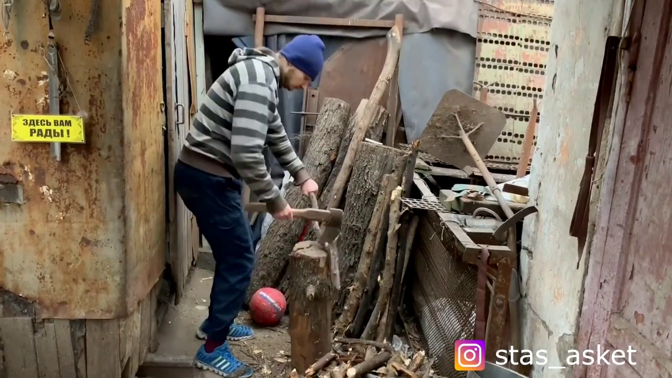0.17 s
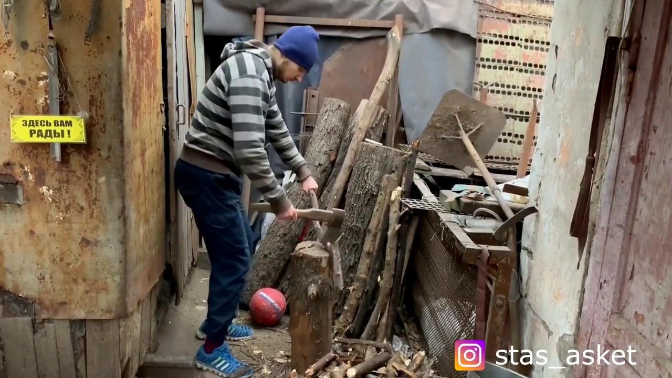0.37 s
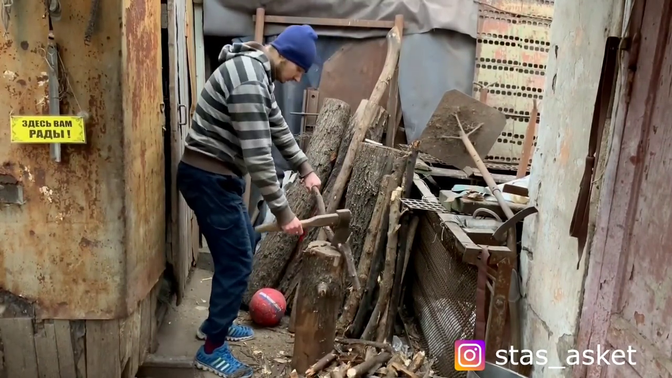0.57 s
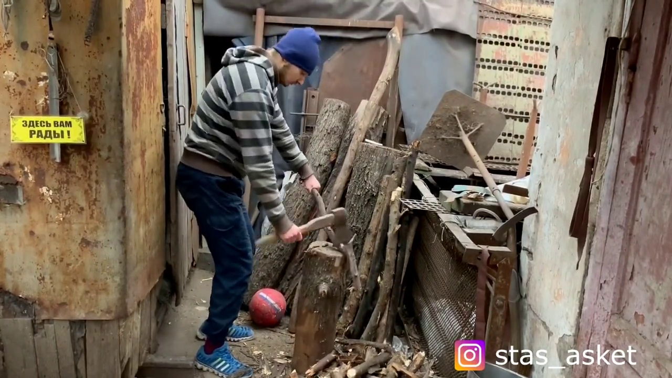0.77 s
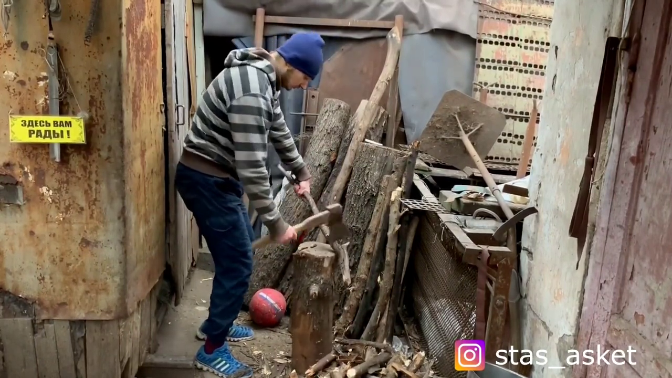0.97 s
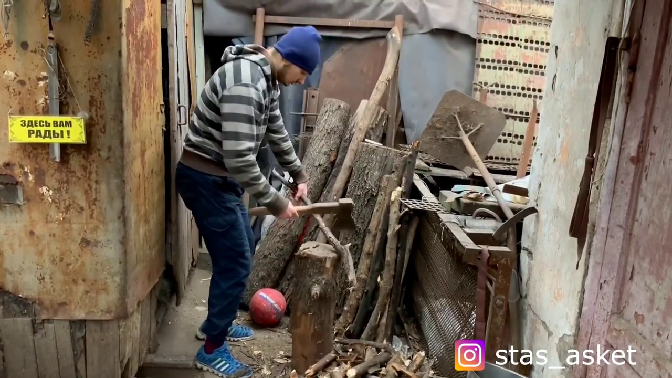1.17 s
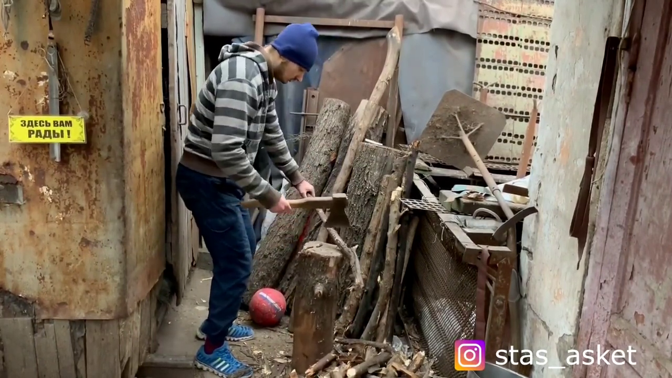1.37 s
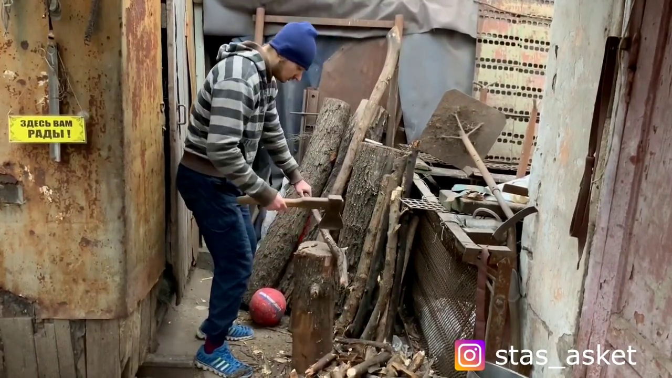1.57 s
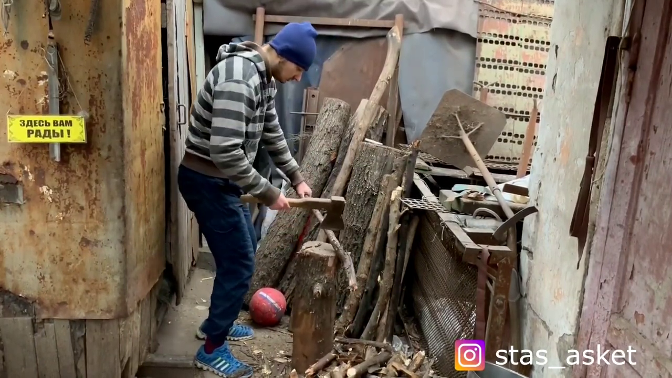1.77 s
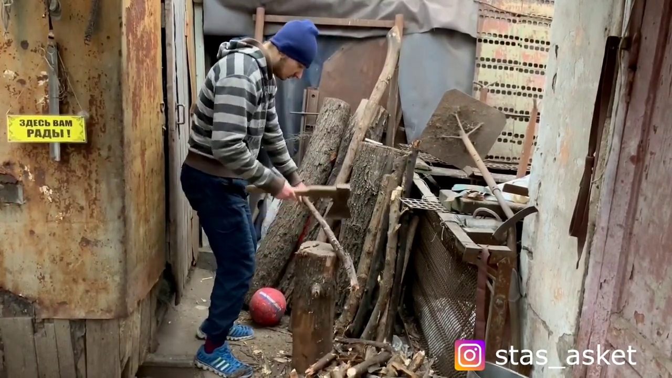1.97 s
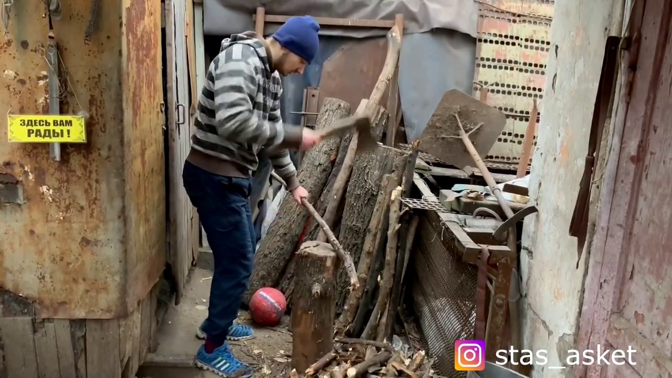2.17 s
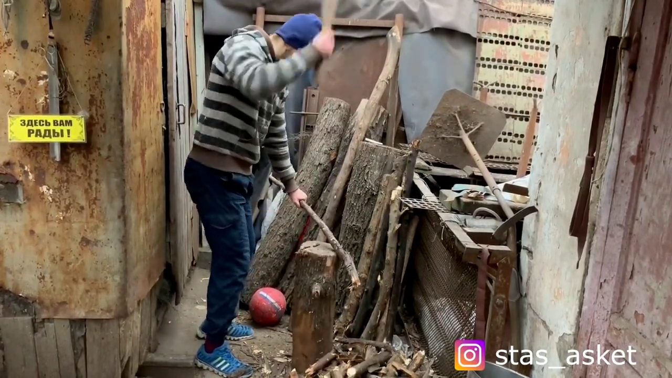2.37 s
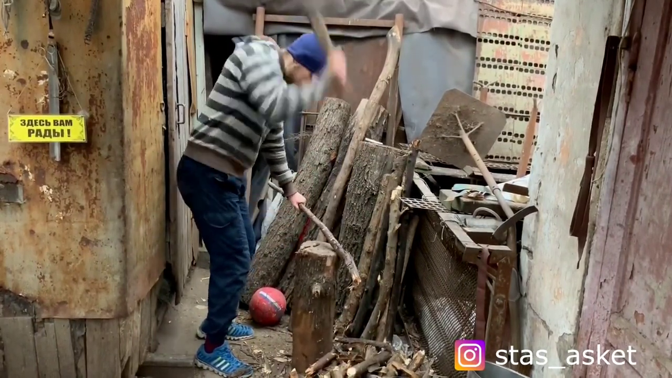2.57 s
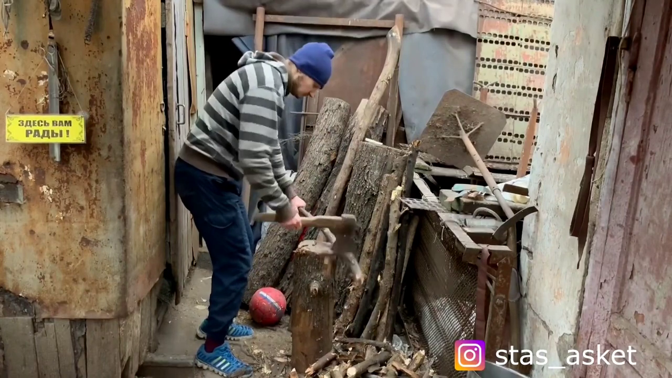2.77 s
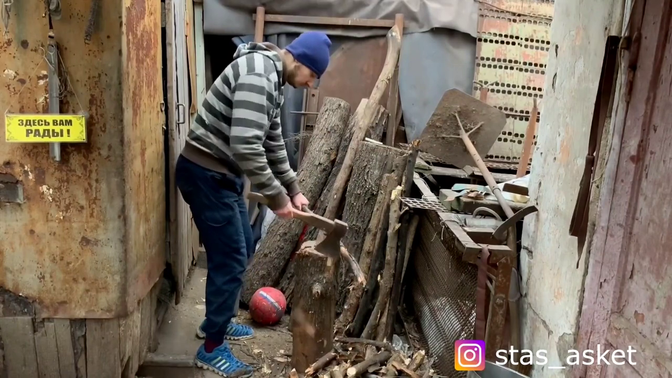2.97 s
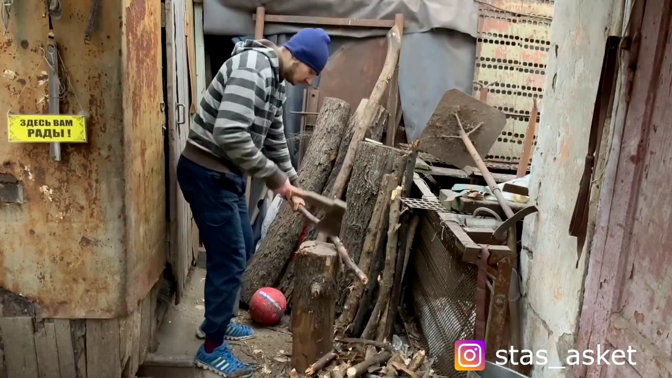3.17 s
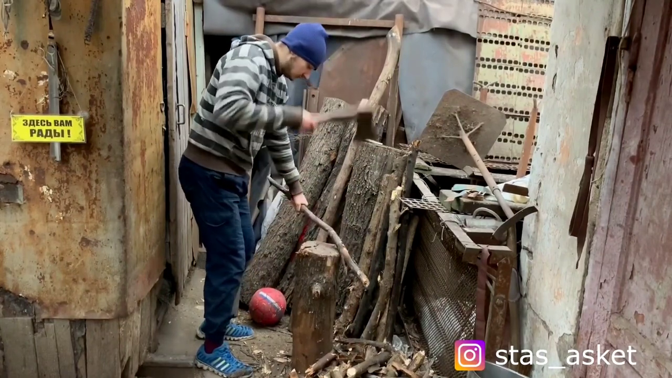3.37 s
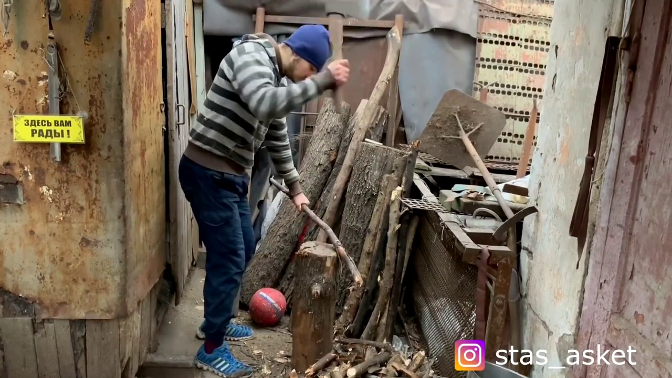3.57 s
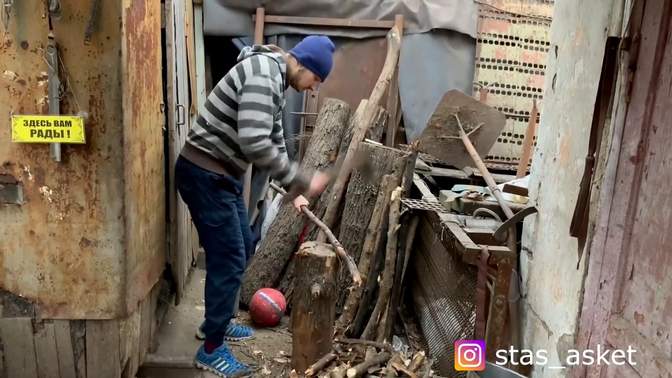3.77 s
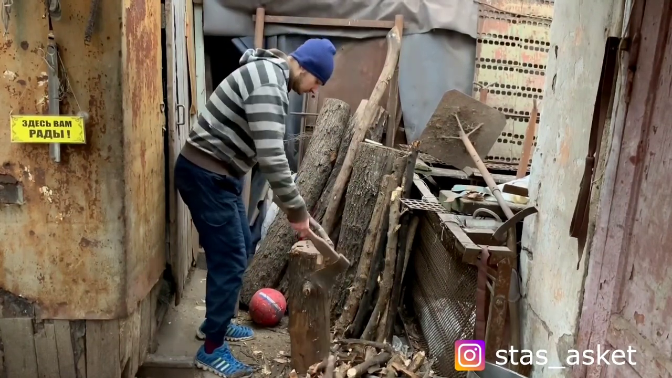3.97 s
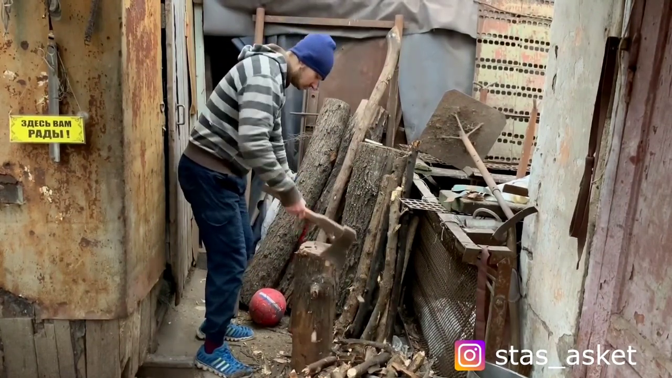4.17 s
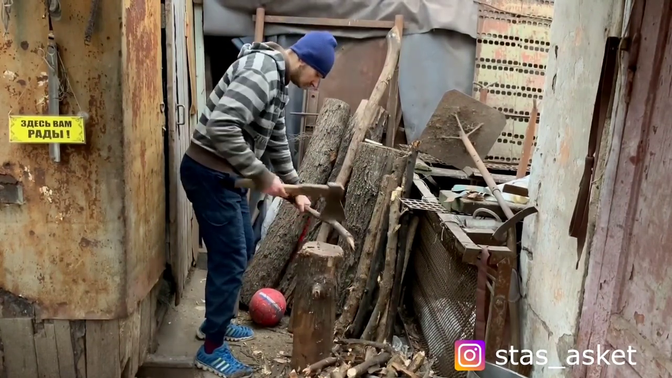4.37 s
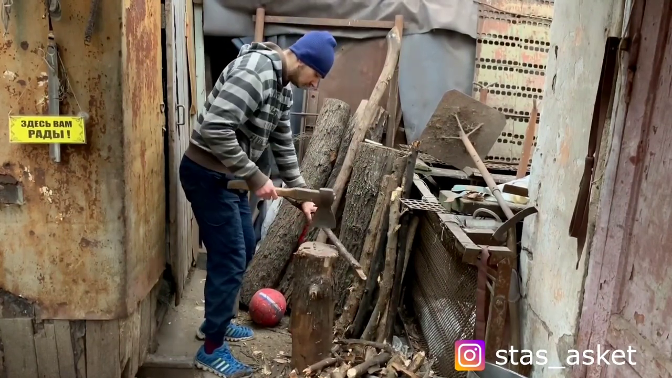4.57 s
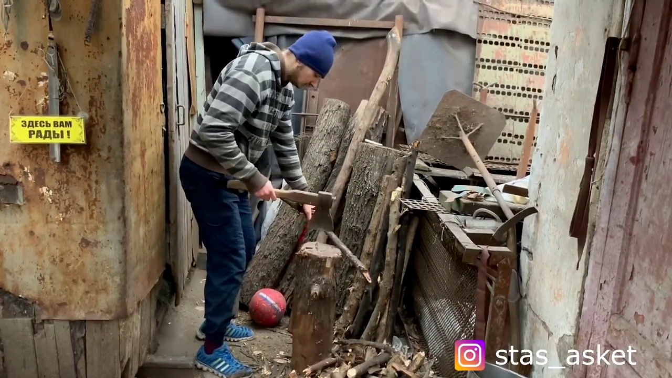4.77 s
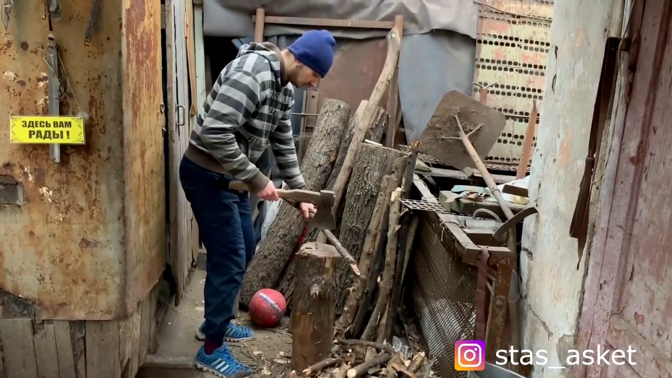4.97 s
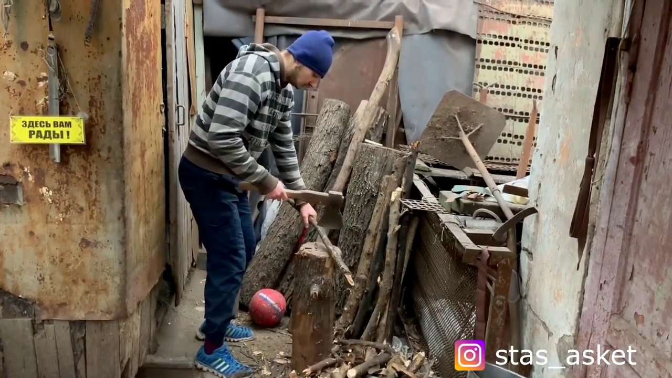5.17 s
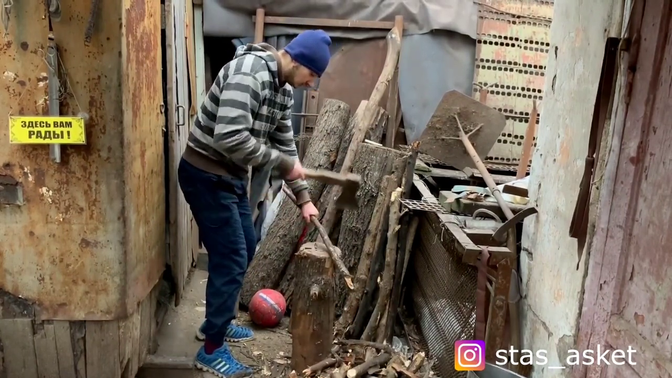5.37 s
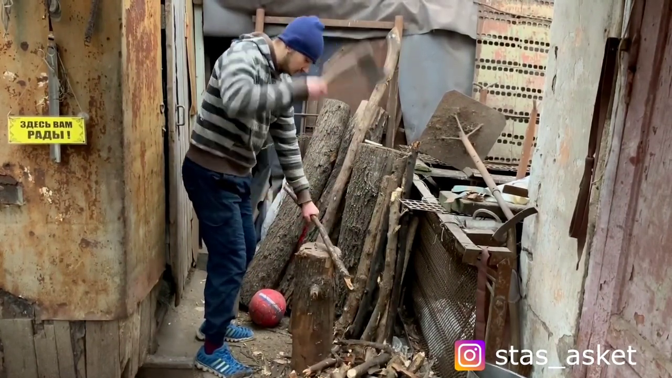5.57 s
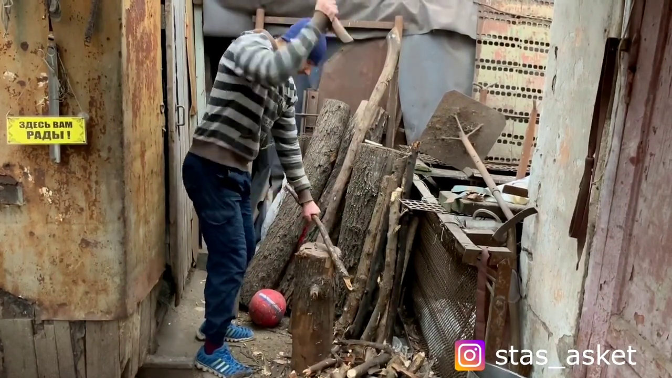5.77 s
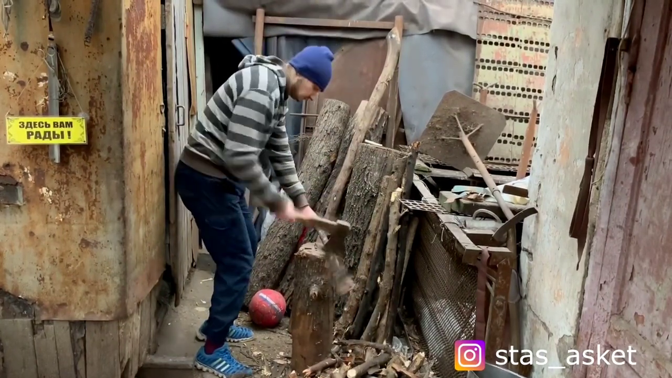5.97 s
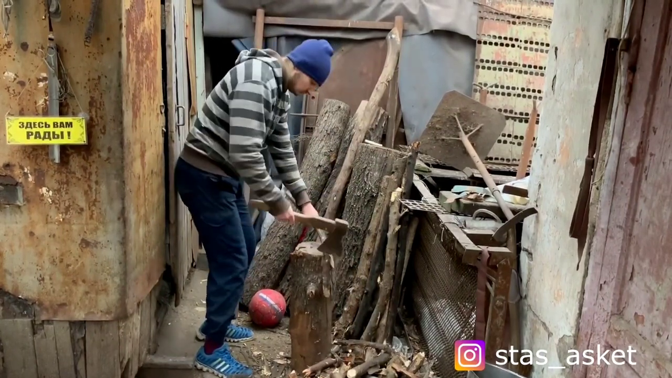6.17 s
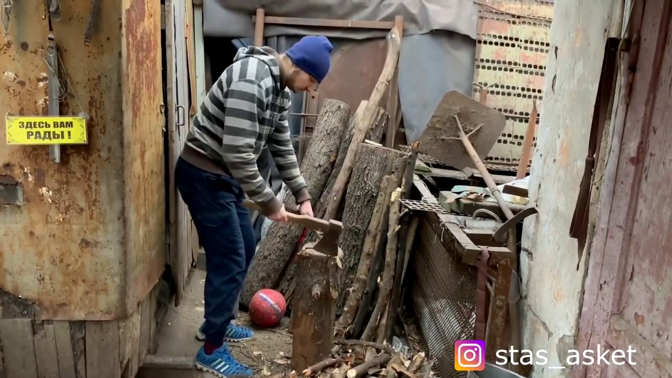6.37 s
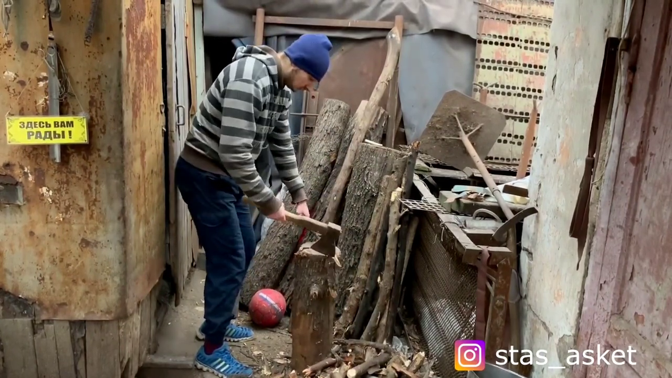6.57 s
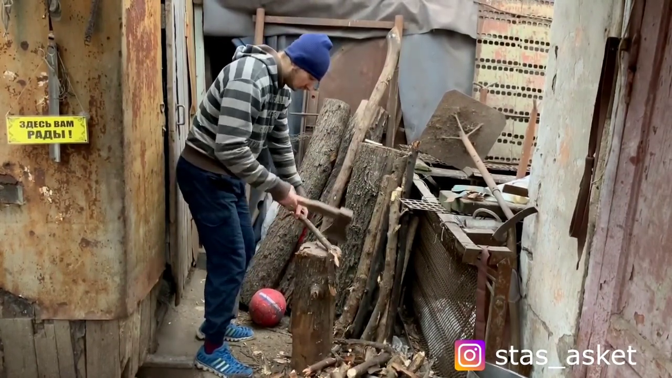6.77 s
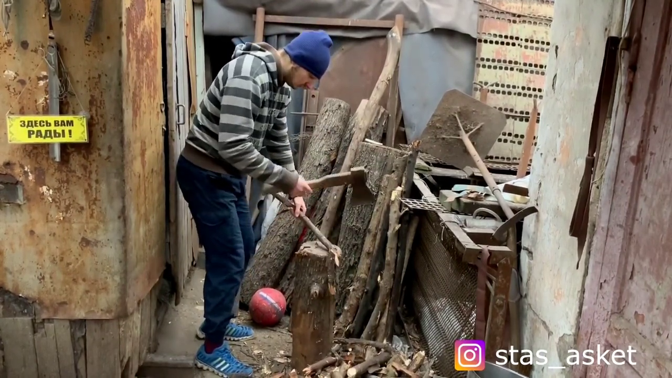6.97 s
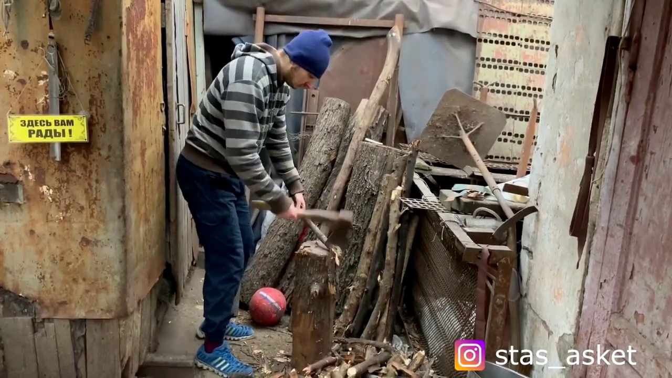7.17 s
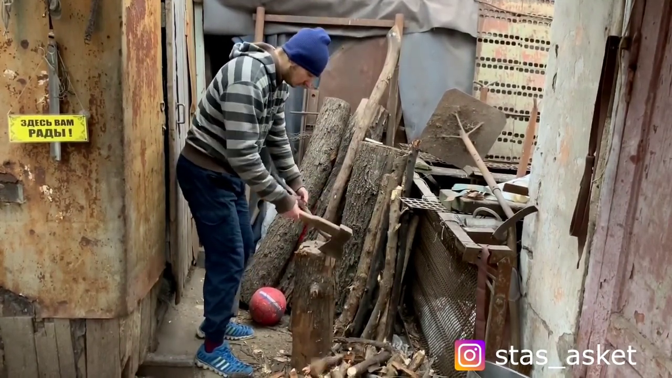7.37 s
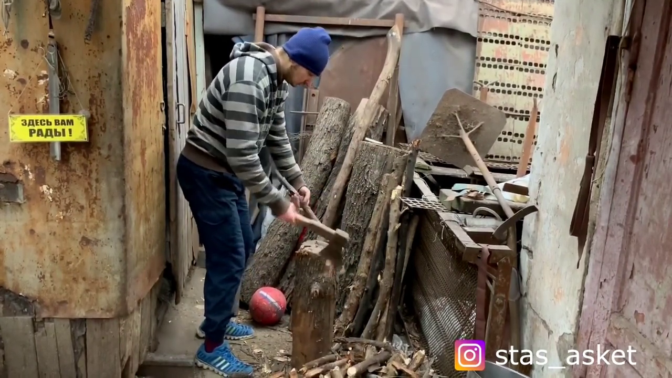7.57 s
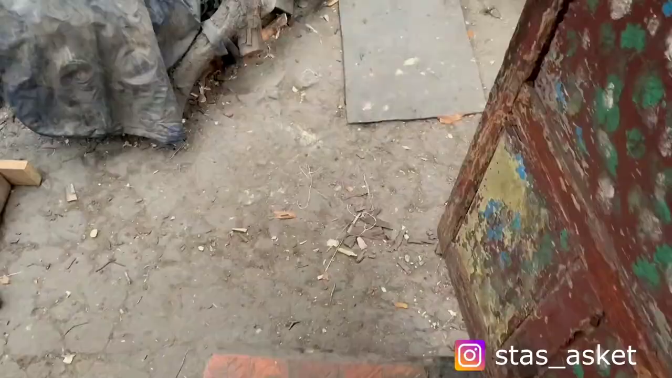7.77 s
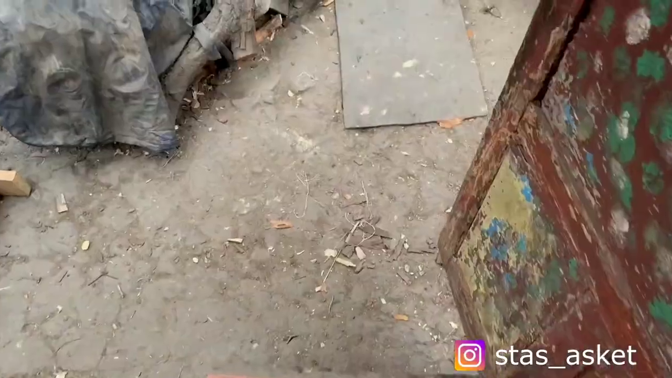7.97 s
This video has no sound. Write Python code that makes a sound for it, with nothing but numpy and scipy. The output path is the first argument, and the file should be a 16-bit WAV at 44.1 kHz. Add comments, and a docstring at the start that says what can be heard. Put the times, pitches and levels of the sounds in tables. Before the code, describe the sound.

Close, dry chopping of a thin branch: hard woody cracks with short thuds, loose pieces tapping and scraping, soft wind rumble underneath.

```python
"""Five hatchet blows crack and thud through a thin branch on a wooden block, close to a stereo microphone.
Cut pieces knock, clatter and scrape between blows, and metal rings faintly; all in a narrow yard between sheds.
Wood is bursts of fibre clicks ringing modes and short wall reflections; metal and hoots are sines.
Wind on the microphone and the distant town are coloured noise; a far breathy whistle is noise on a wavering pitch."""
import sys
import numpy as np
from scipy import signal
from scipy.fft import rfft, irfft
from scipy.io import wavfile

SR = 44100
rng = np.random.default_rng(int(sys.argv[2]) if len(sys.argv) > 2 else 0)


def to_wav(s):
    """Save 16-bit WAV."""
    ch = np.atleast_2d(s).T  # columns
    pcm = np.round(np.clip(ch, -1, 1) * 32767)  # PCM
    wavfile.write(sys.argv[1], SR, pcm.astype(np.int16))


def boost_factor(decibels):
    """Convert a level in decibels to a linear amplitude factor."""
    exponent = np.asarray(decibels, float) / 20
    return 10 ** exponent


N = 353064  # samples, about 8 s

# Table levels are nominal: the layers' own offsets and the final gain come on top.
# axe blows: (time [s], crack level [dB], knock re crack [dB], splinter treble re crack [dB], thud re crack [dB])
BLOWS = [(0.03, -2.5, -7.5, -9, -9.5), (2.6611, -1.5, -9, -10.5, -16), (3.7884, -2.5, -7, -8, -17.5),
         (5.9456, -6.5, -2.5, -16.5, -14), (7.1686, -11.5, -7.5, -9, -10.5)]
# faint swells of crackle, most about 10 to 30 ms ahead of a hard hit: (time [s], level [dB])
SWELLS = [(0.021, -20), (2.651, -16.5), (3.768, -22.5), (5.933, -14), (7.141, -32), (7.325, -38)]
# single knocks of wood on wood: (time [s], level [dB], knock re level [dB], clack [Hz], treble re level [dB])
TAPS = [(0.2788, -48, -12, 2380, -16.5), (0.595, -50, -1, 2570, -9), (0.6379, -41.5, -7.5, 3740, -9),
        (0.8121, -40, -4.5, 3860, -17), (0.9532, -35.5, -22, 1900, -15), (1.0934, -38, -12.5, 2380, -11),
        (1.2276, -48.5, -11.5, 2510, -11), (1.5229, -50, -8.5, 4040, -13.5), (1.6631, -39, 0.5, 2030, -13),
        (2.7816, -41.5, -36, 3490, -5), (2.9274, -44, -11, 3000, -16.5), (2.9871, -56, -12, 3080, 3.5),
        (3.1113, -30.5, -10, 2100, -11), (3.274, -43.5, -40, 4610, -5), (3.3717, -47.5, -20, 2980, -19.5),
        (3.3886, -45, -7.5, 1730, -17), (3.565, -59, -33, 4950, -3), (3.9574, -20, -11.5, 2340, -14.5),
        (4.0064, -53, 14, 1520, -41), (4.2453, -51, 0, 3230, -2.5), (4.3293, -38, -25, 2190, -56.5),
        (4.3784, -37.5, -22, 2280, -42.5), (5.0644, -39, -6, 2500, -9), (5.48, -63.5, -21, 2995, -6.5),
        (6.0851, -38.5, -22, 4290, -7.5), (6.1094, -35.5, -6, 2310, -7), (6.1594, -42.5, -8, 3170, -4.5),
        (6.2294, -48.5, -3, 1530, -1.5), (6.2901, -39.5, -39, 1920, -7), (6.4153, -35.5, -14.5, 2170, -30),
        (6.6672, -43, -13, 4820, -3.5), (6.7516, -52, -7, 2570, -15), (7.3517, -24, -2.5, 3240, -14.5),
        (7.3627, -31, 10.5, 1800, -12.5), (7.3754, -37, -4, 1880, -15.5), (7.9089, -43.5, 5.5, 2210, -62)]
# pieces that land along their length and clatter:
# (time [s], level [dB], knock re level [dB], clack [Hz], treble re level [dB])
CLATTERS = [(0.1845, -30, -1, 3750, -10), (0.3656, -41, -6, 4550, -8.5), (0.5162, -47.5, -2.5, 2050, -13),
            (0.854, -45, -20, 2440, -6.5), (0.8789, -35.5, -14, 2110, -7.5), (0.9064, -37.5, -29, 1930, -8),
            (3.8664, -16.5, -0.5, 1590, -11.5), (3.9275, -34, -31, 2990, -10),
            (4.5214, -37.5, 0, 3340, -15.5), (7.5687, -50, -12, 4100, -5.5), (7.80, -58, 3, 1470, -41),
            (7.862, -58.5, 1.5, 1450, -33)]
# modes of block and branch, free of the blade: (frequency [Hz], level [dB], t60 [s])
WOOD_MODES = [(1710, -6.5, 0.064), (2040, 0, 0.031), (2350, 2.5, 0.59), (2760, -7, 0.3), (3360, -5.5, 0.26),
              (4680, -12.5, 0.43), (4670, -9.5, 0.17), (5650, -13, 0.6)]
# colour of the splintering treble: (frequency [Hz], density [dB per Hz])
SPLINTER_COLOUR = [(2940, -30), (5000, 0.5), (7170, -5.5), (8870, -3.5), (11400, -13.5), (12500, -13),
                   (14600, -15.5), (15800, -22)]
# bark scraping, twigs and chips falling, sleeves: (start [s], length [s], level in 2-9 kHz [dB rms])
RUSTLE = [(0, 0.17, -57.5), (.36, 0.035, -64), (.48, 0.13, -67), (.6, 0.025, -65.5), (.72, 0.035, -69),
          (.85, 0.087, -58.5), (1.04, 0.16, -70.5), (1.19, 0.15, -72.5), (1.39, 0.023, -76),
          (1.52, 0.073, -73), (1.7, 0.055, -65.5), (1.92, 0.099, -80.5), (2.72, 0.052, -58),
          (2.91, 0.078, -65), (3.06, 0.09, -59), (3.28, 0.2, -72.5), (3.52, 0.05, -77.5),
          (3.98, 0.24, -60.5), (4.34, 0.11, -67), (4.54, 0.053, -66.5), (4.68, .08, -86), (4.99, .03, -79),
          (5.06, .1, -73.5), (5.98, .4, -58.5), (6.45, 0.1, -68.5), (6.67, 0.065, -68.5),
          (6.98, 0.042, -92), (7.34, 0.08, -62.5), (7.52, .22, -76), (7.81, 0.2, -68.5)]
# colour of the rustle: (frequency [Hz], density [dB per Hz])
RUSTLE_COLOUR = [(350, -37.5), (600, -3), (779, 3.5), (1680, -4), (1980, -1), (8500, -9), (11500, -21.5),
                 (14100, -22), (16000, -29.5)]
# gusts on the microphone: (time [s], level [dB rms])
WIND = [(0.0, -52), (0.5, -49), (1.16, -65.5), (1.54, -47), (1.81, -63), (2.6, -57.5), (3.05, -57.5),
        (3.41, -52.5), (3.83, -39.5), (4.1, -50), (4.9, -56.5), (5.3, -49.5), (5.73, -41.5), (6.2, -46),
        (6.5, -49.5), (7.13, -49.5), (7.69, -68.5), (8.01, -49)]
# colour of the gusts: (frequency [Hz], density [dB per Hz])
WIND_COLOUR = [(12, -31), (20, -15.5), (49, 6.5), (86, 1.5), (139, -11.5), (292, -23.5), (325, -31),
               (467, -55), (500, -49), (650, -63), (1100, -120)]
# low thumps of a few cycles, mostly wind buffets, the last the thump of a tap:
# (time [s], level [dB], nominal pitch [Hz])
LOW_THUMPS = [(0.467, -38.5, 80), (3.65, -28.5, 91), (3.952, -29, 64.6), (4.007, -33.5, 69),
              (4.135, -35.5, 71.7), (4.524, -32, 75.5), (4.673, -29.5, 100.3), (4.755, -32, 85.3),
              (5.23, -36.5, 74.8), (5.533, -36, 80.7), (5.576, -30.5, 76.6), (5.642, -34.5, 57.7),
              (5.744, -34, 81.5), (5.862, -31, 51), (6.209, -31, 75.5), (6.26, -32, 115),
              (6.394, -36.5, 102.6), (6.767, -36.5, 72.7), (7.138, -37, 60.5), (7.211, -32.5, 54.5),
              (7.245, -37, 54), (7.914, -39, 206.5)]
# colour of the distant town: (frequency [Hz], density [dB per Hz])
HUM_COLOUR = [(59, -23.5), (100, -3.5), (146, -1), (549, -14), (671, -19.5), (741, -19), (1040, -24.5),
              (1150, -27), (1520, -40), (5280, -49), (7270, -60.5), (9070, -41), (12000, -54.5),
              (15600, -78.5), (22000, -120)]
# loudness of the distant town: (time [s], level [dB rms])
HUM_LEVEL = [(0, -53.5), (.6, -59.5), (2.5, -60.5), (4.0, -58.5), (5.0, -63.5), (6.2, -58.5), (7.77, -60),
             (7.92, -53), (8.01, -55)]
# a breathy far whistle that comes and goes: (start [s], length [s], level [dB], pitch [Hz])
WHISTLE = [(0.101, .7, -72, 1219), (1.856, .52, -72, 1232), (4.8, 0.63, -75.5, 1195),
           (6.45, .68, -74, 1194), (7.62, 0.118, -68, 1120)]
# short far hoots: (start [s], length [s], starting pitch [Hz], level [dB])
HOOTS = [(5.70, .16, 707.4, -59), (6.43, 0.196, 765.5, -59), (6.863, .17, 726, -52.5),
         (7.639, .125, 734.7, -52)]
# scrap metal hit by a flying piece: (time [s], frequency [Hz], level [dB], t60 [s])
CHIMES = [(.955, 1827, -51, .4), (.96, 1760, -60, .2), (.95, 2500, -57, .15), (.95, 4400, -52, .14),
          (3.32, 1850, -62, .3)]

# reflections between the sheds: decay, level re direct, corner above which they grow duller as they die
YARD_T60_S, YARD_DB, YARD_CUT_HZ = 0.12, 5.5, 9000
BLOCK_KNOCK_HZ = 970
THUD_HZ, THUD_LAG_S = (108, 181, 237), 0.013  # nominal modes; delay after the blow
RUMBLE_DB, RUMBLE_DB_PER_S = -25.5, -58  # start re thud, decay
TAP_LEAD_MS, TAP_RISE_MS = 4, 4.8  # a tap swells in softly: start ahead of its time, rise time
TAP_MS, CLATTER_MS = 4.4, 11  # decay constant of a loose piece's contact
# slopes in dB per s before, during and after a stroke, and the resting level in dB
RUSTLE_RISE, RUSTLE_SAG, RUSTLE_FALL, RUSTLE_REST_DB = 170, 4.3, 89, -88.5
WHISTLE_RISE, WHISTLE_SAG, WHISTLE_FALL, WHISTLE_REST_DB = 180, -4, 220, -84.5
HOOT_SAG_HZ_PER_S, HOOT_WOBBLE_RAD = 100, 0.035  # pitch fall; random phase step per sample
STEEL_START_S, STEEL_STOP_S = 2.77, 3.28
STEEL_HZ, STEEL_BEAT_HZ = 3075, 5.3  # upper mode, and its distance from the lower
STEEL_DB, STEEL_T60_S, STEEL_PAIR_DB = -58, 1.6, -3  # pair level: lower mode re upper
DIP_S, DIP_WIDTH_S, DIP_DB = 7.765, 0.0104, -15  # a brief dip in level near the end
STOP_HZ = 16432  # the treble is 50 dB down from here


def curve(rows):
    """Columns of a table, joined by straight lines over the scene's time."""
    s, *columns = np.transpose(rows)
    return [np.interp(np.arange(N) / SR, s, c) for c in columns]


def unit(x):
    """Scale to rms 1."""
    return x / np.sqrt(np.mean(x ** 2) + 1e-20)


def top_one(x):
    """Scale to peak 1."""
    return x / np.max(np.abs(x))


def shaped(x, points):
    """Colour a signal by a (Hz, dB) spectrum, interpolated over log frequency."""
    size = x.shape[-1]
    hz = np.maximum(np.fft.rfftfreq(size, 1 / SR), 1)
    point_hz, point_db = np.transpose(points)
    gain = boost_factor(np.interp(np.log(hz), np.log(point_hz), point_db))
    return irfft(rfft(x) * gain, size)


def band(x, low_hz, high_hz):
    """Butterworth band-pass."""
    sos = signal.butter(2, [low_hz, min(high_hz, 0.45 * SR)], "band", fs=SR, output="sos")
    return signal.sosfilt(sos, x)


def drift(rate_hz):
    """Slow chance: noise through two equal low-pass poles, scaled to rms 1."""
    r = np.exp(-2 * np.pi * rate_hz / SR)
    slow = signal.lfilter([1], [1, -2 * r, r * r], rng.standard_normal(N + SR))
    return unit(slow[SR:])  # the first second lets the filter settle


def ring(x, hz, t60):
    """A decaying mode: a two-pole resonator driven by x."""
    r, w = boost_factor(-60 / (t60 * SR)), 2 * np.pi * hz / SR
    return signal.lfilter([0, np.sin(w)], [1, -2 * r * np.cos(w), r * r], x)


def unit_ring(x, hz, t60):
    """A decaying mode scaled to rms 1 over its channels."""
    return unit(ring(x, hz, t60))


def stereo_noise(alike):
    """Two channels of white noise with correlation alike."""
    mid, side = rng.standard_normal((2, N))
    alike = np.clip(alike, -1, 1)
    return np.sqrt(1 + alike) * mid + np.sqrt(1 - alike) * side * [[1], [-1]]


def add(out, s, sound):
    """Mix a sound in at a time."""
    i = int(s * SR)
    out[..., i:i + sound.shape[-1]] += sound[..., :N - i]


def strokes(rows, rise, sag, fall, rest_db):
    """Gain of (start, length, dB) rows: straight dB slopes before, during and after each, over a resting level."""
    t = np.arange(0, N + 64, 64) / SR
    power = boost_factor(2 * rest_db)
    for s, length, db in rows:
        before = rise * np.maximum(s - t, 0)
        during = sag * np.clip(t - s, 0, length)
        after = fall * np.maximum(t - s - length, 0)
        power = power + boost_factor(2 * (db - before - during - after))
    return np.interp(np.arange(N) / SR, t, np.sqrt(power))


def yard(x):
    """Direct sound plus dense short reflections between the shed walls, different at each ear and for each spot."""
    t = np.arange(SR // 4) / SR
    white = rng.standard_normal((2, len(t)))
    low_pass = signal.butter(1, min(YARD_CUT_HZ, 0.45 * SR), fs=SR, output="sos")
    dull = signal.sosfilt(low_pass, white)
    bright = (white - dull) * boost_factor(-20.0 * t / YARD_T60_S)  # the treble dies faster
    echo = (dull + bright) * boost_factor(-60 * t / YARD_T60_S) * np.minimum(t / 0.0012, 1)
    echo = boost_factor(YARD_DB) * echo / np.sqrt(np.sum(echo ** 2, axis=1, keepdims=True))
    echo[:, 0] = boost_factor([-0.5, 0.5])  # direct sound, a little to the right
    return signal.fftconvolve(x[None], echo, axes=1)[:, :len(x)]


def contact(length_ms, rise_ms, modes, knock_db, knock_hz, treble_db):
    """Fibres break in a dying run of uneven clicks that ring the wood modes, a hollow knock and the air."""
    t_ms = np.arange(SR // 4) * 1000 / SR
    length_ms = max(length_ms, 0.5)
    sizes = boost_factor(2.7 * np.minimum(rng.exponential(1, len(t_ms)), 4))
    attack = np.minimum(t_ms / rise_ms, 1) ** 3
    decay = np.exp(-np.maximum(t_ms - rise_ms, 0) / length_ms)
    clicks = yard(rng.standard_normal(len(t_ms)) * sizes * attack * decay)
    ringing = sum(boost_factor(db) * unit_ring(clicks, hz, t60) for hz, db, t60 in modes)
    broad = boost_factor(12.0 + 0.65 * treble_db)  # dull contacts leave mostly the ringing
    crack = unit(unit(ringing) + broad * unit(band(clicks, 1100, 6200)))
    hollow = unit_ring(clicks, knock_hz, 0.0049)
    knock = unit(hollow + boost_factor(0.5) * unit(band(clicks, 480, 1300)))
    treble = unit(shaped(band(clicks, 4100, 26000), SPLINTER_COLOUR))
    mix = crack + boost_factor(knock_db + 4.0) * knock + boost_factor(treble_db + 7.5) * treble
    return mix * np.sqrt(length_ms + 13.0) / 60  # brings the peak near 1


def held_modes():
    """Held down by the blade, the wood modes die fast."""
    return [(hz, db, 0.033 * t60) for hz, db, t60 in WOOD_MODES]


def loose_wood(rows, length_ms):
    """Light contacts of loose wood, each piece with a clack pitch of its own."""
    out = np.zeros((2, N))
    for s, db, knock_db, hz, treble_db in rows:
        sound = contact(length_ms, TAP_RISE_MS, [(hz, 0, 0.007)], knock_db, 1000, treble_db)
        add(out, s - TAP_LEAD_MS / 1000, boost_factor(db) * sound)
    return out


def rustle():
    """Clumped grains of friction over many small chips that ring a few cycles each."""
    level = strokes(RUSTLE, RUSTLE_RISE, RUSTLE_SAG, RUSTLE_FALL, RUSTLE_REST_DB)
    grains = stereo_noise(0.3) * boost_factor(2.0 * rng.exponential(1, N) + 5 * drift(18))
    sizes = boost_factor(3 * np.minimum(rng.exponential(1, N), 3))
    ticks = (rng.random(N) < 300 / SR) * rng.choice([-1, 1], N) * sizes  # about 300 per s
    pitches = np.geomspace(1300, 9000, num=12)
    dealt = rng.integers(0, 12, N)  # which pitch each tick rings
    chips = sum(ring(ticks * (dealt == k) + 1e-18, hz, 20.0 / hz) * np.sqrt(hz)
                for k, hz in enumerate(pitches))
    sound = shaped(unit(grains) + boost_factor(-5.5) * unit(yard(chips)), RUSTLE_COLOUR)
    return level * sound / np.std(band(sound, 2000, 9000))


def wind():
    """Lumpy low pressure noise on the microphone, mostly common to both channels."""
    level_db = curve(WIND)[0] + 3.5 * drift(3.4) + 2.5 * drift(5.8)
    return boost_factor(level_db) * unit(shaped(stereo_noise(0.75), WIND_COLOUR))


def hum():
    """The distant town: coloured noise whose level wavers slowly."""
    level_db = curve(HUM_LEVEL)[0] + 1.9 * drift(5.0)
    return boost_factor(level_db) * unit(shaped(stereo_noise(0.45), HUM_COLOUR))


def swells():
    """Faint crackle that swells in: slow-rising runs of clicks over the wood modes."""
    out = np.zeros((2, N))
    for s, db in SWELLS:
        add(out, s - 0.008, boost_factor(db) * contact(21.0, 14.0, held_modes(), -6.0, 1400, -6.0))
    return out


def blows():
    """The blade cracks through to the block: short, sharp runs of fibre clicks."""
    out = np.zeros((2, N))
    for s, db, knock_db, treble_db, thud_db in BLOWS:
        sound = contact(4.94, 1.9, held_modes(), knock_db, BLOCK_KNOCK_HZ, treble_db)
        add(out, s - 0.001, boost_factor(db) * sound)
    return out


def rumble():
    """Low noise that dies away after each blow."""
    level = np.zeros(N)
    for s, db, knock_db, treble_db, thud_db in BLOWS:
        decay_db = RUMBLE_DB_PER_S * np.arange(SR) / SR
        add(level, s, boost_factor(db + thud_db + RUMBLE_DB + decay_db))
    return level * unit(band(band(stereo_noise(0.8), 39, 110), 33, 160))


def thuds():
    """The block jolts on the ground a moment after each blow: one push rings three low modes."""
    out, t = np.zeros(N), np.arange(SR // 5) / SR
    push = np.exp(-t / 0.0022) * np.minimum(t / 0.0016, 1)
    for s, db, knock_db, treble_db, thud_db in BLOWS:
        low, middle, high = [top_one(ring(push, hz * rng.normal(1, 0.043), 0.047)) for hz in THUD_HZ]
        jolt = band(boost_factor(-5.5) * low + middle + high, 110, 350)
        add(out, s + THUD_LAG_S, boost_factor(db + thud_db) * jolt)
    return out * boost_factor([[-1.2], [1.2]])  # a little to the right


def whistle():
    """Narrow noise carried on a wavering pitch, its breath different in each channel."""
    hz, = curve([(s + length / 2, hz) for s, length, db, hz in WHISTLE])
    rows = [row[:3] for row in WHISTLE]
    level = strokes(rows, WHISTLE_RISE, WHISTLE_SAG, WHISTLE_FALL, WHISTLE_REST_DB)
    phase = 2 * np.pi * np.cumsum(hz + 54.0 * drift(5.3)) / SR
    breath = [drift(60) * np.sin(phase) + drift(60) * np.cos(phase) for side in "LR"]
    return level * np.array(breath)


def clatters():
    """Pieces landing along their length stay longer in contact."""
    return loose_wood(CLATTERS, CLATTER_MS)


def taps():
    """Single short knocks of loose wood on wood."""
    return loose_wood(TAPS, TAP_MS)


def low_thumps():
    """Wind buffets, and last the thump of a tap: each gives a few cycles that fall in pitch."""
    out, t = np.zeros(N), np.arange(SR // 5) / SR
    envelope = top_one(t / 0.012 * np.exp(-t / 0.0093))
    for s, db, hz in LOW_THUMPS:
        falling_hz = hz * (0.79 + 1.6 * np.exp(-t / 0.006))
        phase = 2 * np.pi * np.cumsum(falling_hz) / SR
        add(out, s, boost_factor(db) * envelope * np.sin(phase))
    return out


def chimes():
    """Thin scrap metal rings on single decaying partials."""
    out, t = np.zeros(N), np.arange(SR // 2) / SR
    for s, hz, db, t60 in CHIMES:
        partial = np.sin(2 * np.pi * (hz * t + rng.random()))
        add(out, s, boost_factor(db - 60 * t / t60) * np.minimum(t / 0.007, 1) * partial)
    return out * boost_factor([[1.5], [-1.5]])  # a little to the left


def steel_head():
    """The steel head sings once free of the wood after the second blow; a close pair of modes beats."""
    out = np.zeros(N)
    t = np.arange(int((STEEL_STOP_S - STEEL_START_S) * SR)) / SR
    upper = np.sin(2 * np.pi * STEEL_HZ * t)
    lower = np.sin(2 * np.pi * (STEEL_HZ - STEEL_BEAT_HZ) * t)
    pair = upper - boost_factor(STEEL_PAIR_DB) * lower
    decay = boost_factor(STEEL_DB - 60 * t / STEEL_T60_S)
    add(out, STEEL_START_S, decay * pair * signal.windows.tukey(len(t), 0.25))
    return out * boost_factor([[1.5], [-1.5]])  # a little to the left


def hoots():
    """Short far tones that sag in pitch, with a phase wobble of its own in each channel."""
    out = np.zeros((2, N))
    for s, length, hz, db in HOOTS:
        t = np.arange(int(length * SR)) / SR
        for side in out:
            wobble = np.cumsum(rng.normal(0, HOOT_WOBBLE_RAD, len(t)))
            turns = (hz - HOOT_SAG_HZ_PER_S * t / 2) * t + rng.random()
            tone = np.sin(2 * np.pi * turns + wobble)
            add(side, s, boost_factor(db) * signal.windows.tukey(len(t), 0.7) * tone)
    return out


def scene():
    """Near wood and metal over wind, the distant town and far tones."""
    wood = rustle() + swells() + blows() + rumble() + thuds() + clatters() + taps()
    metal = chimes() + steel_head()
    low = wind() + low_thumps()
    far = hum() + whistle() + hoots()
    return wood + metal + low + far


def band_limit(x):
    """A steep low-pass at the top of the band."""
    return signal.sosfilt(signal.butter(12, 16460, fs=SR, output="sos"), x)


def record(dry):
    """The level dips briefly near the end, peaks are rounded softly and the top treble is cut."""
    t = np.arange(N) / SR
    dip = boost_factor(DIP_DB * np.exp(-((t - DIP_S) / DIP_WIDTH_S) ** 2))
    rounded = 1.356 * np.tanh(dry * dip / 1.105)
    top_cut = signal.cheby2(10, 50, STOP_HZ, fs=SR, output="sos")
    mix = signal.sosfilt(top_cut, rounded)
    return band_limit(mix)


dry = scene()
out = record(dry)
to_wav(out)
```